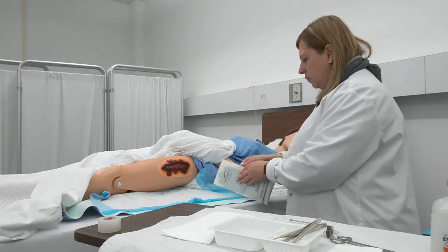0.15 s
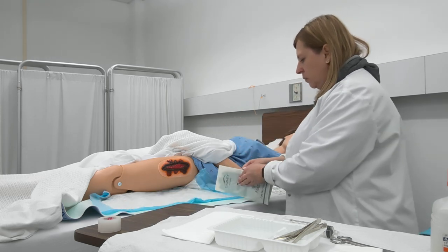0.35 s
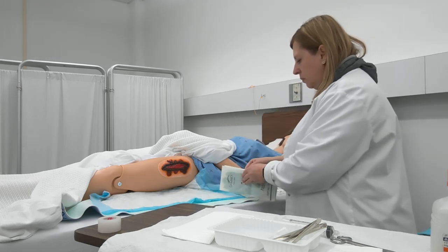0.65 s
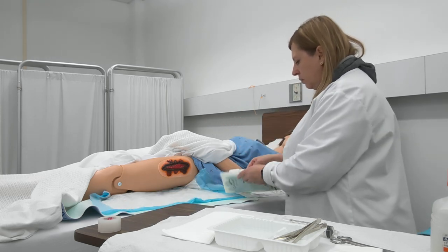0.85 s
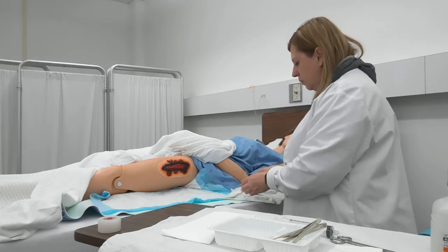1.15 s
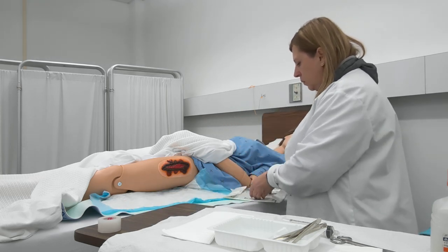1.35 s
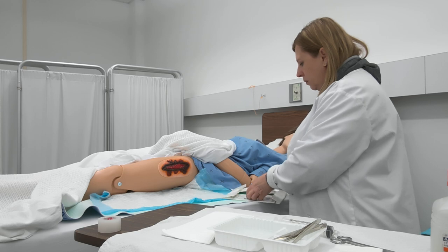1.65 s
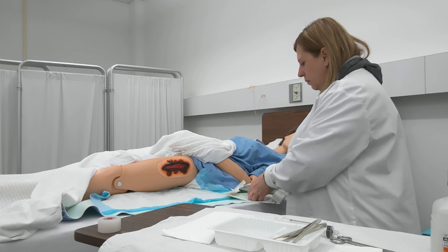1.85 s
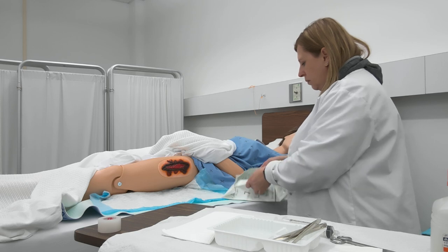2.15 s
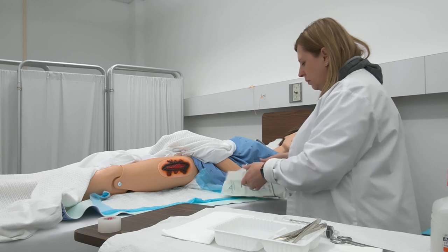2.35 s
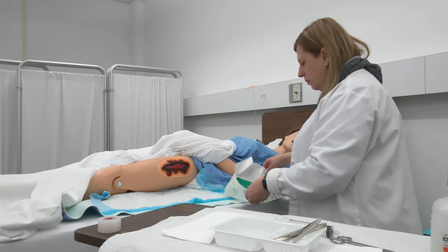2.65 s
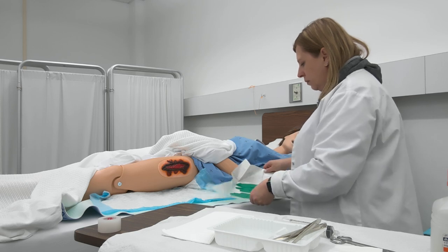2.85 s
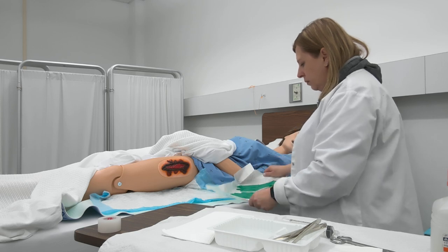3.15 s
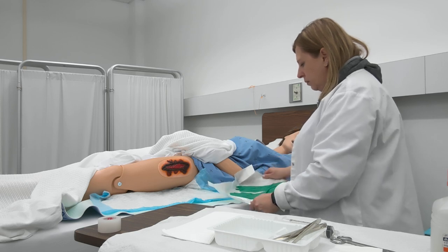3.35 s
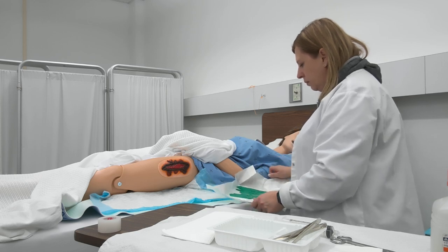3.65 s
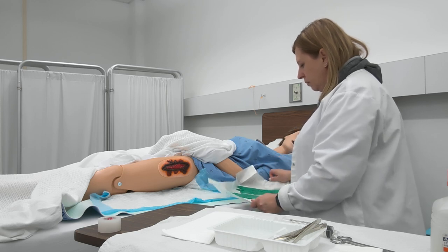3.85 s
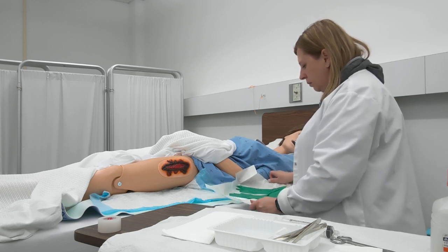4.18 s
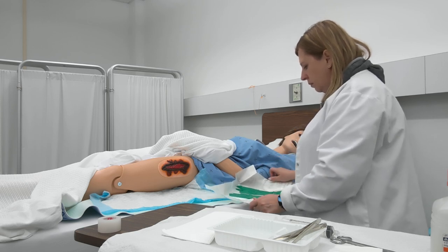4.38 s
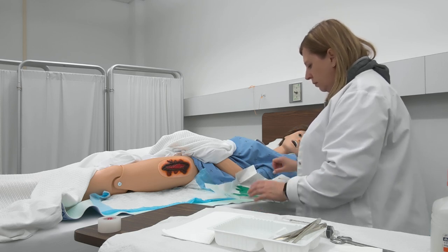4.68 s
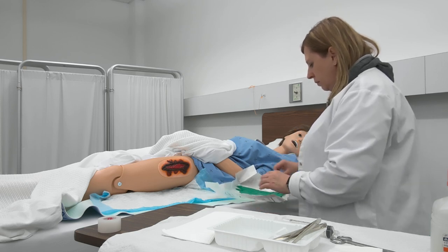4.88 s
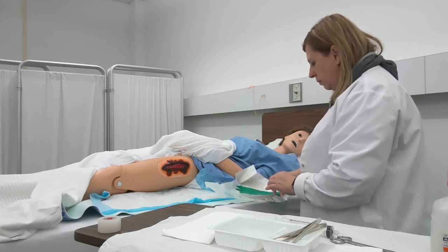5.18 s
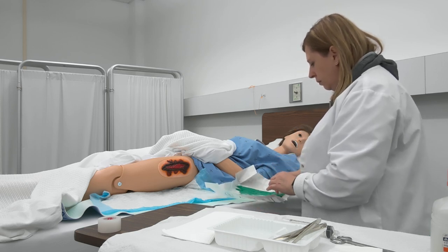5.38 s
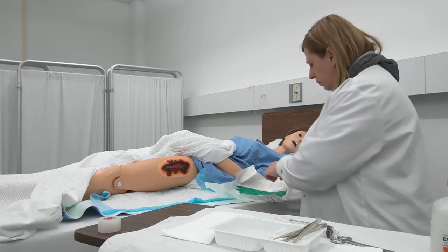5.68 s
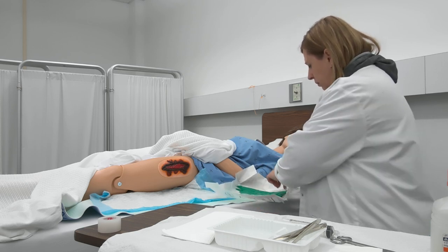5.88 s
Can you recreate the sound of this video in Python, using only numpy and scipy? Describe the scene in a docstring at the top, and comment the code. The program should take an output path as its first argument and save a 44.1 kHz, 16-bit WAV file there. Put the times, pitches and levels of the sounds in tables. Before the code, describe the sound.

A stiff paper wrapper is peeled open and unfolded in a quiet hard-walled room, snapping and crackling, then a sleeve brushes faintly over ventilation rumble.

```python
"""In a quiet, hard-walled room, a stiff paper wrapper is peeled open and unfolded on a bed.
Creases snap one by one (clicks, noise bursts and rings) over a crackle of countless tiny bursts.
A folded pocket, made of noise through a narrow resonance, rings when it is pressed flat.
Ventilation rumbles, hums and hisses behind (shaped noise and a slow tone).
At the end a coat sleeve brushes softly (grainy noise whose colour moves)."""
import sys
import numpy as np
from scipy import signal
from scipy.fft import rfft, irfft
from scipy.io import wavfile
from scipy.ndimage import uniform_filter1d

SR = 44100
rng = np.random.default_rng(int(sys.argv[2]) if len(sys.argv) > 2 else 0)


def master_out(mix):
    """Clip the mix to full scale and print it as 16-bit PCM to the path in sys.argv[1]."""
    frames = np.transpose(np.atleast_2d(mix))
    ceiling = np.clip(frames, -1, 1)
    pcm = np.round(ceiling * 32767).astype(np.int16)
    wavfile.write(sys.argv[1], SR, pcm)


N = 265508  # length [samples]


def gain_of(db):
    """Turns decibels into a factor."""
    return 10 ** (np.asarray(db) / 20)


def evened(x):
    """Scales a sound to an rms of 1."""
    return x / np.sqrt(np.mean(x ** 2) + 1e-20)


def smoothed(x, *widths):
    """Takes a moving average once for each width [samples]."""
    for width in widths:
        x = uniform_filter1d(x, width)
    return x


def read(points, hz):
    """Reads a (frequency, value) table, spacing frequency by its logarithm."""
    f, value = np.transpose(points)
    return np.interp(np.log(hz + 1), np.log(f + 1), value)


def curves(rows):
    """Turns each column of a time table into one value per sample."""
    s, *columns = np.transpose(rows)
    return [np.interp(np.arange(N) / SR, s, column) for column in columns]


def add(mix, s, sound):
    """Mixes a sound in, starting at second s."""
    part = mix[:, round(s * SR):][:, :sound.shape[1]]
    part += sound[:, :part.shape[1]]


def band(x, lo_hz, hi_hz):
    """Keeps the frequencies between two limits, without smearing sound ahead of its start."""
    return signal.sosfilt(signal.butter(3, [lo_hz, hi_hz], "bandpass", fs=SR, output="sos"), x)


def coloured(x, points):
    """Gives a sound the listed spectrum; a minimum-phase filter keeps the sharp front of clicks."""
    log_gain = np.log(gain_of(read(points, abs(np.fft.fftfreq(4096, 1 / SR)))))
    taps = np.fft.ifft(np.exp(np.conj(signal.hilbert(log_gain)))).real[:2048]
    return signal.oaconvolve(x, taps[None])[:, :N]


def resonate(x, hz, width_hz):
    """Shifts the curve hz down to zero, smooths, and shifts back: a resonance that can move."""
    turn = np.exp(2j * np.pi * np.cumsum(hz * np.ones(N)) / SR)
    r = np.exp(-np.pi * width_hz / SR)
    return 2 * (turn * signal.lfilter([1 - r], [1, -r], x / turn)).real


def fading(pulses, settle_s):
    """Lets every pulse die away, to 37 % after settle_s; close pulses add up."""
    return signal.lfilter([1], [1, -np.exp(-1 / (settle_s * SR))], pulses)


# How alike left and right are, before pair() raises it to a power:
# (frequency [Hz], likeness [0 to 1])
LIKENESS = [(60, 0.99), (180, 0.99), (550, 0.99), (1650, 0.94), (4970, 0.077), (15000, 0.22)]


def pair(left, other, power=3.):
    """Two close microphone ports share more of a sound at some frequencies, most in the bass."""
    size = left.shape[-1]
    same = np.clip(read(LIKENESS, np.fft.rfftfreq(size, 1 / SR)), 0, 1) ** power
    right = irfft(same * rfft(left) + np.sqrt(1 - same ** 2) * rfft(other), size)
    return np.array([left, right])


def noise(points):
    """Steady noise from all around, with the listed spectrum and rms 1."""
    shape = gain_of(read(points, np.fft.rfftfreq(N, 1 / SR)))
    return evened(irfft(shape * rfft(pair(*rng.standard_normal((2, N)))), N))


# Rise and fall of the deep rumble while the paper is busy: (time [s], level [dB])
RUMBLE_LEVEL = [(0.0, -69), (0.18, -63.5), (0.44, -68.5), (0.89, -61), (0.94, -73), (1.02, -54.5),
                (1.42, -70), (2.21, -51.5), (2.63, -56.5), (2.72, -54), (2.77, -64), (2.8, -51),
                (3.52, -53), (3.69, -74), (3.97, -55.5), (4.46, -67.5), (5.92, -69), (6.02, -65.5)]
# Spectrum of the low part of the ventilation: (frequency [Hz], relative level [dB per Hz])
DUCT_SPECTRUM = [(3, -14), (9, -3.5), (16, -9), (35, -10), (50, -8.5), (66, -13.5), (113, -15),
                 (150, -11.5), (189, -17.5), (273, -9), (340, -16.5), (520, -37.5)]
# Spectrum of its hiss: (frequency [Hz], relative level [dB per Hz])
AIR_SPECTRUM = [(120, -50.5), (200, -25), (278, -0.5), (328, -10), (491, -18), (538, -20.5), (933, -26.5),
                (1000, -30), (1870, -34.5), (16000, -51.5)]
AIR_DB, HUM_DB = -83.5, -78.0  # steady hiss and steady hum
THUD_DB = -4.5  # low thud of the sheet, relative to its flapping
FAN_HZ, FAN_SHARE = 25.9, .75  # middle pitch of the fan's turning tone; its part of the rumble


def ventilation():
    """A faint steady hiss, a rumble that rises and falls, and a hum that thickens when the sheet flaps."""
    rumble_db, = curves(RUMBLE_LEVEL)
    hum_gain = np.hypot(gain_of(HUM_DB), gain_of(THUD_DB) * handling()[0])
    low, hz = rfft(noise(DUCT_SPECTRUM)), np.fft.rfftfreq(N, 1 / SR)

    # Deep lies below about 90 Hz, upper above about 320 Hz, and the hum in between
    deep = 1 / (1 + (hz / 90) ** 6)
    upper = 1 / (1 + (320 / (hz + 1)) ** 6)
    rumble = evened(irfft(low * deep, N))
    hum = evened(irfft(low * np.maximum(1 - deep - upper, 0), N))

    waver = evened(smoothed(rng.standard_normal(N), 9000, 9000))
    fan = evened(np.sin(2 * np.pi * np.cumsum(FAN_HZ + .8 * waver) / SR))
    rumble = FAN_SHARE * fan + np.sqrt(1 - FAN_SHARE ** 2) * rumble
    hiss = evened(irfft(rfft(noise(AIR_SPECTRUM)) * upper, N))
    return gain_of(rumble_db) * rumble + hum_gain * hum + gain_of(AIR_DB) * hiss


# What the hands do, before the shake of the snaps is added: (time [s], fine crackle level [dB],
# panels over the crackle [dB], whole sheet flapping over the crackle [dB])
HANDS_AT_WORK = [(0.05, -76, -5, 4.0), (0.065, -61.5, -14, -11), (0.11, -60.5, -6, -24),
                 (0.2, -64.5, -2.5, -12), (0.36, -72.5, 1.5, -11), (0.46, -73, 1.5, -3.5),
                 (0.58, -71.5, -5.5, -12.5), (0.63, -62.5, -1.5, -13.5), (0.71, -59, -3.5, -15.5),
                 (0.77, -51.5, -3, -10), (0.84, -65, -2, -8), (0.97, -61, -1, -9.5), (1.04, -62.5, 2, -6.5),
                 (1.12, -57, 0.5, 0), (1.24, -96.5, 1, 14.5), (1.275, -84, 3, 1), (1.3, -51.5, -5.5, -19),
                 (1.36, -68.0, -15, -19), (1.44, -65, -9, -35), (1.55, -72.5, -0.5, -3),
                 (1.68, -57, 1.5, -14), (1.85, -53.5, -3.5, -6.5), (1.93, -66, 6, -2.5),
                 (2.1, -53, 0.0, -4), (2.32, -51.5, 0.5, -3.0), (2.39, -55.5, 1, -2.5),
                 (2.5, -54.5, 0.5, 0.0), (2.59, -49, 4.5, 1.5), (2.7, -63, 2, -1), (2.88, -49, 2.5, -4.0),
                 (2.97, -56.5, 2, -1.5), (3.16, -48.5, 0, -4.5), (3.24, -53.5, 2.5, -2.5),
                 (3.37, -58, -1, -3), (3.53, -59.5, 1, -3.5), (3.62, -81, -2, 1), (3.77, -95, -4, 0),
                 (3.8, -68.5, 1, -11), (3.96, -51.0, 2.5, 0.5), (4.04, -72.5, 7.5, 4),
                 (4.08, -55.5, 1, -6.0), (4.22, -78, -9, -1.5), (4.245, -76.5, 2.5, -2),
                 (4.33, -61.5, -4.5, -5.0), (4.41, -68.5, -6, -11.5), (4.6, -99.0, 3, 6),
                 (4.67, -99.0, 9, 9), (4.705, -67, -12.5, -18), (4.78, -94, -4, -6), (4.9, -100.0, 3, 7)]
SHAKE_DB, SHAKE_S = -28.5, 0.013  # extra crackle relative to the snap's listed level; time to settle
# Thin edges over the fine crackle; they dull as the whole sheet takes over [dB per dB]
EDGES_DB, EDGES_PER_SHEET = -8.5, .2


def handling():
    """Gains of flapping sheet, panels, fine crackle and thin edges: hands' effort plus the shake of snaps."""
    crackle_db, panels_db, sheet_db = curves(HANDS_AT_WORK)
    snap_db = np.transpose(CREASES)[1]
    effort = gain_of(crackle_db) + fading(at_snaps(gain_of(snap_db + SHAKE_DB)), SHAKE_S)
    t = np.arange(N) / SR
    touch = (t > HANDS_AT_WORK[0][0]) * (t < HANDS_AT_WORK[-1][0])
    edges_db = EDGES_DB - EDGES_PER_SHEET * sheet_db
    return touch * effort * gain_of([sheet_db, panels_db, 0 * sheet_db, edges_db])


# Colour of the paper, before its bands are levelled: (frequency [Hz], relative level [dB per Hz])
PAPER_SPECTRUM = [(180, -31.5), (300, -5), (624, -12), (814, -1.5), (1100, -8), (1250, 2), (1460, 1),
                  (3520, -2), (5430, 0.5), (13300, -12), (16000, -18)]
# Limits between sheet, panels, fine crackle and thin edges: (frequency [Hz])
BAND_LIMITS = (1000, 3000, 9000)


def crackle(per_s=3000, spread_db=3.5, clump_db=2.5, count=28):
    """Countless small creases in clumps; most are tiny, and each kind has its own noise burst."""
    clumps = evened(smoothed(rng.standard_normal(N), 400, 250))
    size_db = spread_db * np.minimum(rng.exponential(1, N), 4) + clump_db * np.clip(clumps, -2, 2)
    size = gain_of(size_db + swarms()) * (rng.random(N) < per_s / SR)

    kind, grains = rng.integers(0, count, N), np.zeros((2, N))
    for k, z in enumerate(rng.standard_normal((count, 2, 200))):
        grains += signal.oaconvolve((size * (kind == k))[None], burst(z, .0005), axes=1)[:, :N]
    sliding = pair(*rng.standard_normal((2, N)))
    grains = coloured(evened(grains) + 0.084 * sliding, PAPER_SPECTRUM)

    limits = (280, *BAND_LIMITS, 18000)
    sheet, panels, fine, edges = [evened(band(grains, a, b)) for a, b in zip(limits, limits[1:])]
    ringing = evened(resonate(grains, np.maximum(panel_hz(), BAND_LIMITS[0]), 480))
    panels = evened(3.1 * panels + ringing)
    return sum(gain * part for gain, part in zip(handling(), (sheet, panels, fine, edges)))


def swarms(boost_db=3.0, settle_s=0.021):
    """After every snap the sheet rearranges itself: the small creases grow louder, then settle."""
    return boost_db * np.minimum(fading(at_snaps(1), settle_s), 1.3)


def panel_hz():
    """The panel freed by the latest snap also colours the crackle that follows."""
    s, ring_hz = np.transpose(CREASES)[[0, 2]]
    latest = np.clip(np.searchsorted(s, np.arange(N) / SR) - 1, 0, None)
    return smoothed(ring_hz[latest], 200)


def burst(z, fall_s, start=0, lead_in_db=-21.5):
    """A click and a short noise burst, a little different at each port; with start, faint noise swells first."""
    t = (np.arange(z.shape[1]) - start) / SR
    lead_in = gain_of(lead_in_db) * np.exp(np.minimum(t, 0) / 0.0044) * (t < 0)
    click = .8 * np.exp(-np.maximum(t, 0) / 0.00012)
    shape = lead_in + (click + np.exp(-np.maximum(t, 0) / fall_s)) * (t >= 0)
    x = pair(*z, power=.28) * shape
    return x * np.linalg.norm(shape) / np.linalg.norm(x[0])


# The clearest creases, before the final band gains: (time [s], crack level [dB], ring of the freed
# panel [Hz], ring over crack [dB], thin edge over crack [dB], crack colour [Hz])
CREASES = [(0.064, -47.5, 1360, -2, -1, 4860), (0.0937, -35, 1780, -15.5, -3.5, 6650),
           (0.0998, -38, 1890, -16, -10, 6130), (0.1094, -41, 1720, -27, -3, 7730),
           (0.1452, -45, 2152, -9, -6, 4750), (0.188, -37, 2220, -16, -12, 5840),
           (0.2016, -52, 1963, -21, 3, 8180), (0.2189, -52, 1973, -17, -3, 5450),
           (0.2384, -46, 1945, -17, -17, 6760), (0.274, -43, 1400, -8, -16, 6700),
           (0.3117, -33, 1303, -15.5, -18, 6940), (0.3701, -56, 2000, 4, -25, 4320),
           (0.39, -53, 1550, -1, -18, 4740), (0.4183, -36, 2480, -6.5, -4.5, 7000),
           (0.4793, -43.5, 1906, -13, -21, 7740), (0.5065, -43.5, 2465, -12, -18, 6510),
           (0.5583, -42, 2993, -25, -14, 4480), (0.6004, -40.5, 3000, -19, -3, 5380),
           (0.606, -35, 3000, -11.5, -18, 3410), (0.631, -37.5, 1156, -12, -14, 7120),
           (0.667, -44, 1780, -16, -7, 5380), (0.6992, -48.5, 1380, -19, -9, 4080),
           (0.733, -33.5, 1744, -19, -19, 7900), (0.7507, -37, 1850, -15, -10, 5400),
           (0.7682, -30, 2380, -13, -14, 5900), (0.8181, -35.5, 1353, -17, -17, 5840),
           (0.857, -35, 1504, -14, -6.5, 8750), (0.8654, -50, 1846, -17, -18, 3920),
           (0.8864, -43, 1390, -19, -24, 4190), (0.9301, -39.5, 1070, -19, -16, 4360),
           (0.9574, -47, 1220, 2.5, -9, 5260), (0.9672, -40.5, 1070, -3.5, -5.5, 6620),
           (0.9904, -39.5, 2287, -10, -15, 5300), (1.011, -43.5, 1210, -22, -5, 4130),
           (1.0518, -40.5, 1227, -7, -13, 4900), (1.1063, -41.5, 1035, -2.5, -27, 3710),
           (1.285, -42.5, 2830, -14, -4, 5830), (1.3045, -41, 1870, -8.5, -5.5, 4960),
           (1.3825, -42.5, 1878, -25, -9, 6170), (1.3985, -44, 2220, -9, -5.5, 6060),
           (1.4964, -58, 1800, -11, -7, 6240), (1.5195, -42.5, 1570, -18, -14, 6300),
           (1.5758, -53.5, 1920, 5, -9.5, 6070), (1.6173, -42, 2021, -13.5, -5, 6600),
           (1.6573, -38, 1741, -3, 3, 5090), (1.6936, -32, 1854, -19, -6.5, 5340),
           (1.726, -33, 1860, -6, -13.5, 4040), (1.7633, -27, 1736, -2, -14, 3910),
           (1.8148, -33.5, 1834, -26, -8, 4850), (1.8595, -32, 1770, -5.5, -10, 5200),
           (1.8914, -33, 1480, -8, -20, 3950), (1.954, -42.5, 1763, -12, -3.5, 5940),
           (1.9783, -48.5, 1590, 10.5, -23, 3380), (1.9981, -38.5, 810, 5.5, -16, 3480),
           (2.033, -39, 955, -4, -12, 4030), (2.0497, -33, 948, -8, -13, 5190),
           (2.1036, -32, 800, 4, -12, 4200), (2.1307, -26.5, 1870, -25, -12, 5570),
           (2.15, -32, 1673, -12, -6, 6230), (2.1774, -37.5, 931, -2.5, -6, 6810),
           (2.194, -24.5, 2190, -12, -9, 5060), (2.2492, -30.5, 1160, -9.5, -14, 4400),
           (2.259, -30, 1160, -3, -20, 5380), (2.2912, -32, 693, -8, -19, 4100),
           (2.3165, -29, 1399, -13, -15, 4100), (2.3602, -39, 1240, -8, -22, 4300),
           (2.4002, -32.5, 1423, -9, -16, 4500), (2.4416, -29.5, 1564, -13, -20, 4110),
           (2.4734, -30, 1120, -11, -7.5, 4740), (2.5242, -33.5, 1740, -6.5, -21, 6220),
           (2.5462, -30, 1230, -4.5, -13, 6300), (2.5726, -32.5, 873, -7.5, -8, 4030),
           (2.6331, -28, 1730, -7, -9, 4270), (2.671, -39.5, 2100, -11, -11.5, 4675),
           (2.729, -29.5, 2350, -13.5, -15, 3915), (2.7798, -30.5, 1270, -5.5, -10, 6240),
           (2.803, -27, 1223, -8.5, -11, 6010), (2.8591, -20, 1540, -18, -6.5, 5310),
           (2.9328, -35, 2710, -12, -10.5, 4640), (2.9547, -43, 1310, -9.5, -12.5, 3970),
           (2.9924, -35.5, 2700, -9.5, -9, 4180), (3.032, -25.5, 2138, -11, -7, 3390),
           (3.057, -27, 1289, -14, -9, 3664), (3.1085, -35, 1310, -4, -12, 4470),
           (3.1308, -29, 751.5, -1, -16, 5300), (3.1549, -25, 1260, -10.5, -14, 5800),
           (3.272, -26, 1260, -10.5, -16, 7550), (3.3145, -38.5, 980, -4, -22, 3330),
           (3.3498, -34, 869, -0.5, -19, 4130), (3.3713, -42, 1870, -4, -4, 4120),
           (3.4047, -54, 2170, -23, -22, 3780), (3.467, -42, 1750, -14, -25, 4910),
           (3.477, -51, 2640, -24, -18, 5980), (3.5064, -37, 2164, -12, -24, 4800),
           (3.5734, -42.5, 2600, -8.5, -12, 4100), (3.688, -65, 2127, -10.5, -21, 4710),
           (3.7963, -46.5, 2712, -10, -15, 7240), (3.8117, -38.5, 1241, -8, -19, 4100),
           (3.8496, -32, 1240, -9.5, -13, 4840), (3.8867, -32, 1253, -17, -15, 4290),
           (3.9044, -47, 980, -15, 1, 5730), (3.9385, -37.5, 1014, -4, -8, 5530),
           (3.9899, -37, 1090, -8, -8.5, 4580), (4.0523, -30, 1227, -12, -8, 4760),
           (4.1086, -36, 1232, -19, -16, 5590), (4.235, -47.5, 1252, -25, -25, 4510),
           (4.2638, -41, 1244, -37, -14, 5360), (4.3088, -38, 2970, -6, -9, 5740),
           (4.353, -41.5, 2166, -15, -10, 7550), (4.3775, -39.5, 2458, -13.5, -10, 4820),
           (4.397, -48.5, 1960, -8, -17, 5220), (4.5044, -76, 756, -5, -24, 5460),
           (4.6971, -43, 2850, -29, -19, 6500), (4.7618, -67, 871, -12, -21, 5510),
           (4.7984, -68, 2175, -8, -20, 3930)]
CRACK_S = 0.00088  # time for a crack's noise to fall to 37 %


def at_snaps(heights):
    """Silence with a single-sample pulse at every snap."""
    pulses = np.zeros(N)
    pulses[np.round(np.transpose(CREASES)[0] * SR).astype(int)] = heights
    return pulses


def snaps(after_db=-15.5, count=4):
    """Each crease cracks in its own colour, sets off smaller neighbours and leaves a small panel ringing."""
    start, size = 300, 1600  # samples: soft lead-in before the crack, whole snap
    t = np.maximum(np.arange(size) - start, 0) / SR
    cracks, edges, rings = np.zeros((3, 2, N))
    for s, db, ring_hz, ring_db, edge_db, crack_hz in CREASES:
        crack = burst(rng.standard_normal((2, size)), CRACK_S, start=start)
        # Each pass repeats all that came before it, weaker and later
        for wait, weak in rng.random((count, 2)):
            later = np.roll(crack, round((0.0014 + 0.019 * wait) * SR), axis=1)
            crack = crack + gain_of(after_db - 9.7 * weak) * later
        peaked = 0.31 * crack + signal.lfilter(*signal.iirpeak(crack_hz, 2.2, SR), crack)
        tone = gain_of(-60 * t / 0.02) * np.sin(2 * np.pi * ring_hz * t)  # falls 60 dB in 0.02 s
        ring = tone + 1.1 * crack
        first = s - start / SR
        add(cracks, first, gain_of(db) * peaked)
        add(edges, first, gain_of(db + edge_db) * crack)
        add(rings, first, gain_of(db + ring_db) * ring)
    low, mid, high = BAND_LIMITS
    return (gain_of(2.0) * band(cracks, mid, high) + gain_of(7.5) * band(edges, high, 17000)
            + gain_of(-0.5) * band(rings, 0.74 * low, mid))


# Presses on a folded pocket of the wrapper: (start time [s], length [s], level [dB])
PRESSES = [(3.507, 0.018, -55), (3.805, 0.15, -63), (4.047, 0.013, -51), (4.137, 0.022, -73),
           (4.25, 0.05, -67)]
POCKET_HZ, POCKET_WIDTH_HZ = 1255, 55  # centre and width of its first resonance
PRESS_S, LIFT_DB_PER_S = 0.016, 800  # rise time of a press; how fast it fades after its length


def pocket():
    """A folded pocket rings while pressed flat: uneven rubbing in a narrow resonance."""
    rub = rng.standard_normal(N) * gain_of(3.0 * evened(smoothed(rng.standard_normal(N), 500)))
    ring = resonate(resonate(rub, POCKET_HZ, POCKET_WIDTH_HZ), POCKET_HZ, 3 * POCKET_WIDTH_HZ)
    t, presses = np.arange(N) / SR, np.zeros(N)
    for s, length, db in PRESSES:
        rise = np.clip((t - s) / PRESS_S, 0, 1)
        presses += rise * gain_of(db - LIFT_DB_PER_S * np.maximum(t - s - length, 0))
    return presses * evened(ring)


# The brushing sleeve: (time [s], level [dB], colour of the rubbing [Hz])
SLEEVE_MOVES = [(5.52, -108, 3430), (5.604, -84, 4780), (5.628, -93.5, 4290), (5.668, -85.5, 3370),
                (5.728, -80, 3420), (5.798, -75, 4660), (5.846, -72, 4620), (5.95, -87.5, 4960),
                (6.0, -99, 4450)]
# Spectrum of the cloth before the moving colour: (frequency [Hz], relative level [dB per Hz])
CLOTH_SPECTRUM = [(590, -33.5), (1000, -10), (1120, -19.5), (1260, -4), (1570, -20), (2080, -11.5),
                  (2330, -14), (4960, -8.5), (16000, -26)]


def sleeve():
    """Cloth slides on cloth: a soft, grainy hiss whose colour moves with the arm."""
    db, hz = curves(SLEEVE_MOVES)
    grain = gain_of(1.1 * evened(smoothed(rng.standard_normal(N), 400)))
    hiss = noise(CLOTH_SPECTRUM)
    hiss = evened(hiss + 0.37 * evened(resonate(hiss, hz, 1300)))
    fade = np.clip((np.arange(N) / SR - SLEEVE_MOVES[0][0]) / .05, 0, 1)
    return gain_of(db) * fade * grain * hiss


# How long the room rings: (frequency [Hz], time to fall 60 dB [s])
ROOM_FALL = [(400, 0.39), (1500, 0.32), (4000, 0.24), (10000, 0.06), (16000, 0.06)]
# Echoes off bed, table and walls: (time before it is varied [s], level [dB])
NEAR_ECHOES = [(.0016, -7), (.0063, -12), (0.0105, -26), (0.022, -29)]


def reply(tail_db=-14.0):
    """The room's answer to a click: near echoes, and sparse taps of random sign that die band by band."""
    size, step = SR // 2, 20
    taps = np.zeros((2, size))
    start = np.arange(200, size - step, step)
    at = start + rng.integers(0, step, (2, len(start)))
    np.put_along_axis(taps, at, rng.choice([-1., 1.], at.shape), 1)
    hz, t, z = signal.stft(taps, SR, nperseg=256)
    fall = gain_of(-60 * t / read(ROOM_FALL, hz)[:, None])
    tail = pair(*signal.istft(z * fall, SR, nperseg=256)[1][:, :size])
    tail *= gain_of(tail_db) / np.linalg.norm(tail[0])
    for s, db in NEAR_ECHOES:  # each echo shifts with the spot and reaches the ports from another side
        first = round(s * SR * rng.uniform(0.74, 1.4))
        tail[[0, 1], [first, first + rng.integers(-1, 2)]] += gain_of(db)
    return tail


def room(x, count=6, moves_per_s=9.5):
    """The sounding spot wanders over the sheet, so the room's answer blends from one reply to the next."""
    place = np.arange(N) / SR * moves_per_s
    out = np.zeros((2, N))
    for k in range(count):
        near = np.clip(1 - abs((place - k + count / 2) % count - count / 2), 0, 1)
        out += signal.fftconvolve((x * np.sin(np.pi / 2 * near))[None], reply(), axes=1)[:, :N]
    return out


LAG_S = .000012  # delay of the paper at the left port


def scene():
    """The paper lies a little to one side: the left port hears it and its echoes a moment later."""
    paper = snaps() + crackle() + pocket()
    late = np.exp(-2j * np.pi * np.fft.rfftfreq(N, 1 / SR) * np.array([[LAG_S], [0]]))
    heard = irfft(rfft(paper + room(paper[0])) * late, N)
    return (heard + ventilation() + sleeve()) * gain_of([[.2], [-.2]])  # left a touch louder


def record(dry):
    """The recorder's band limit: a steep filter removes what lies above about 15900 Hz."""
    return signal.oaconvolve(dry, signal.firwin(255, 15900, window=("kaiser", 9), fs=SR)[None], "same")


dry = scene()
out = record(dry)
master_out(out)
```